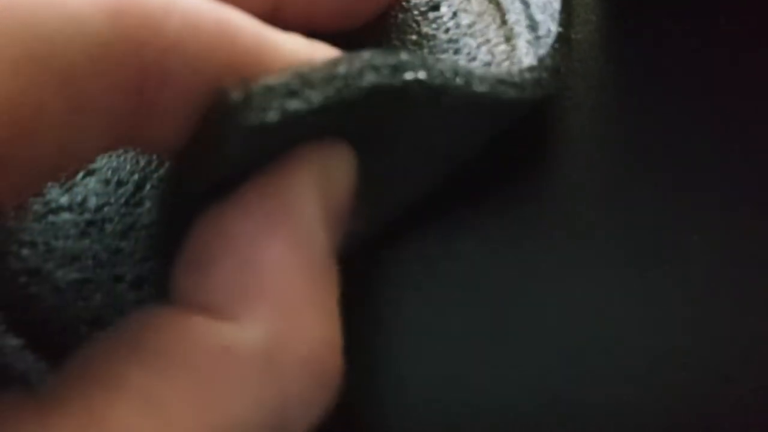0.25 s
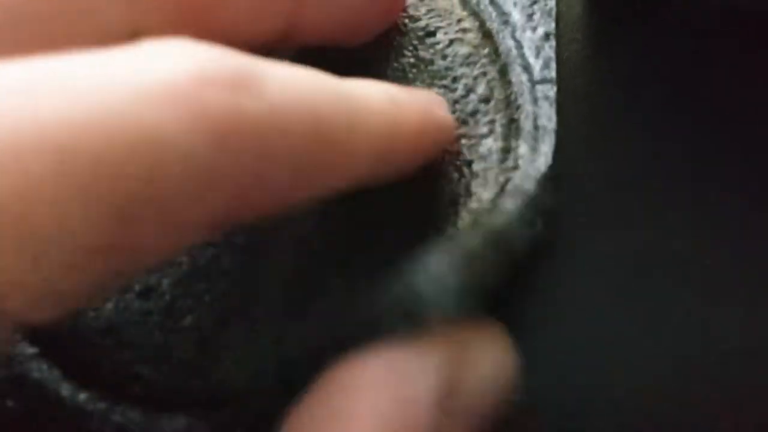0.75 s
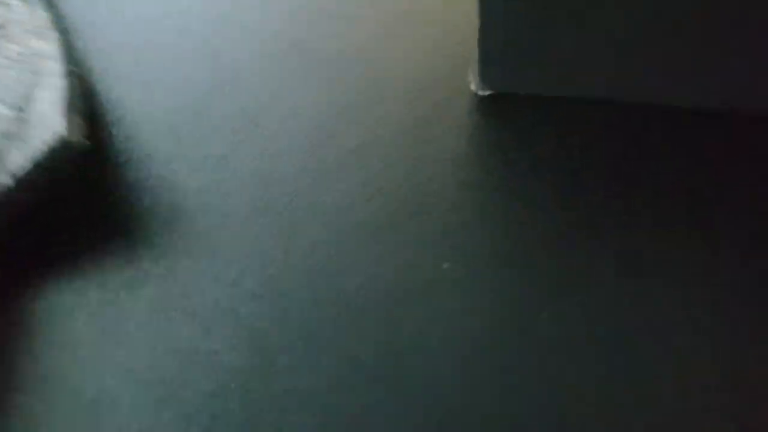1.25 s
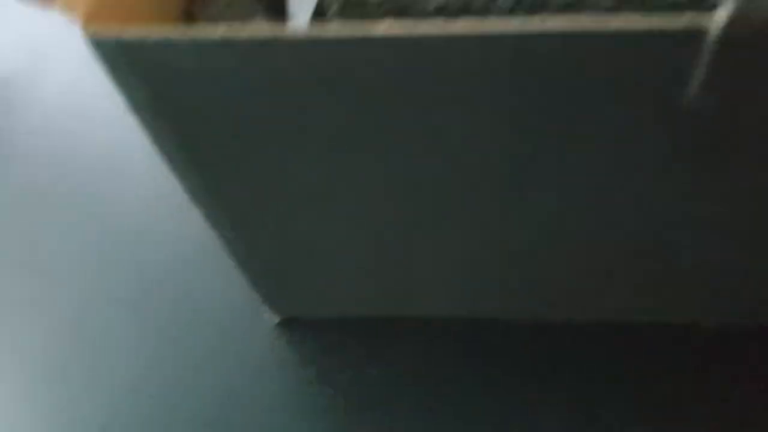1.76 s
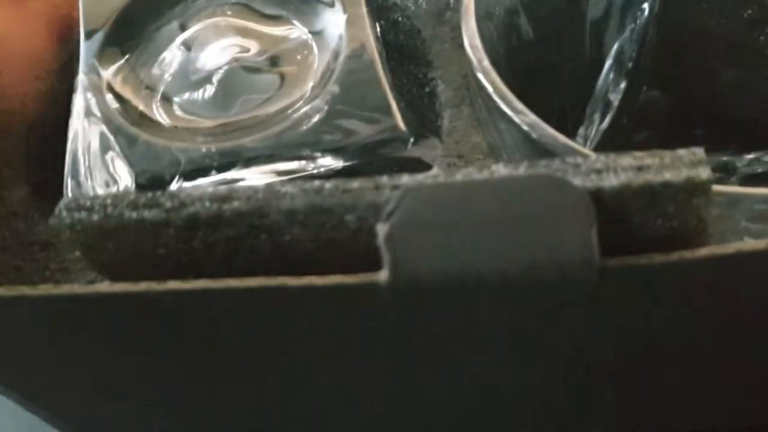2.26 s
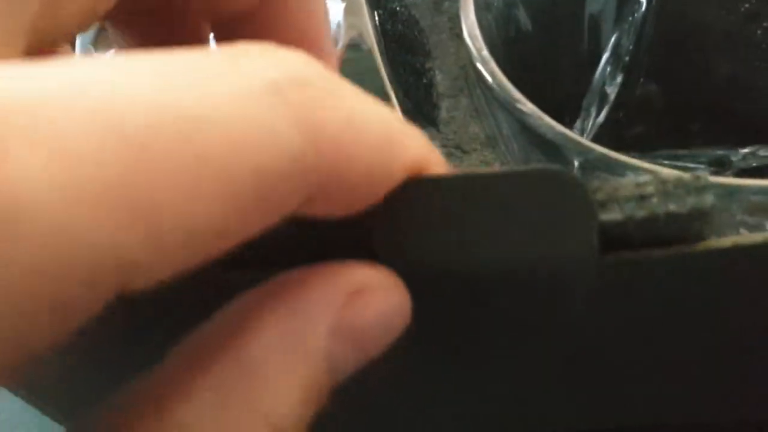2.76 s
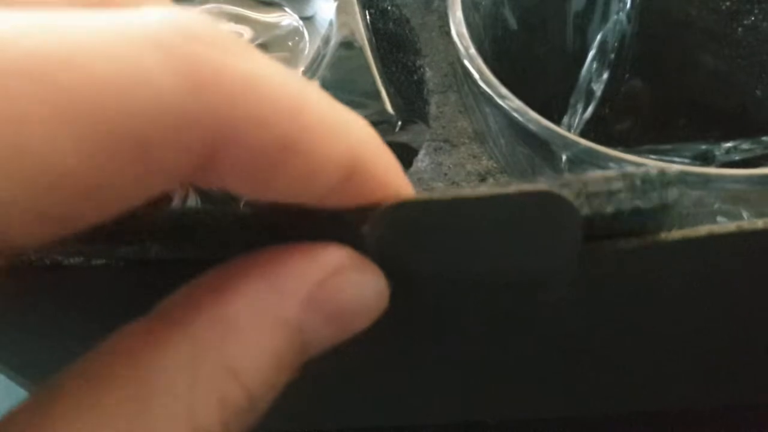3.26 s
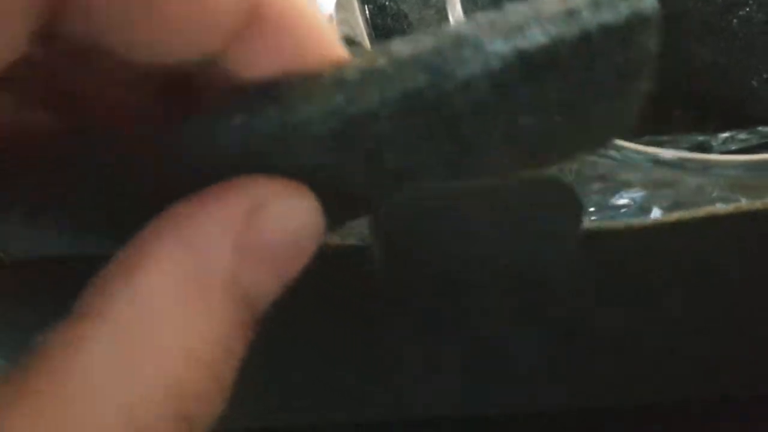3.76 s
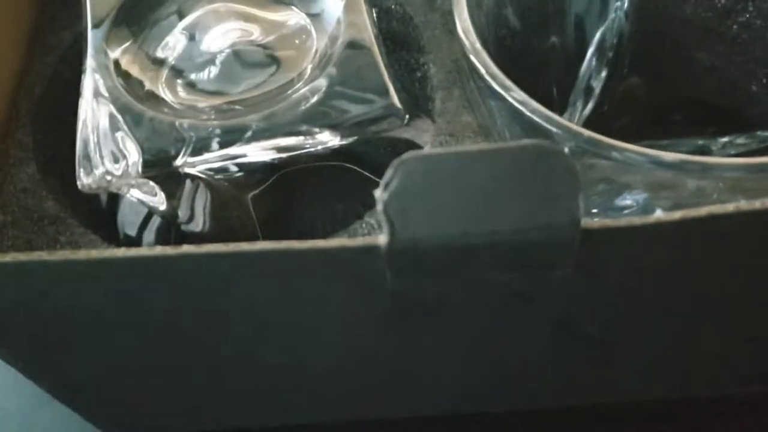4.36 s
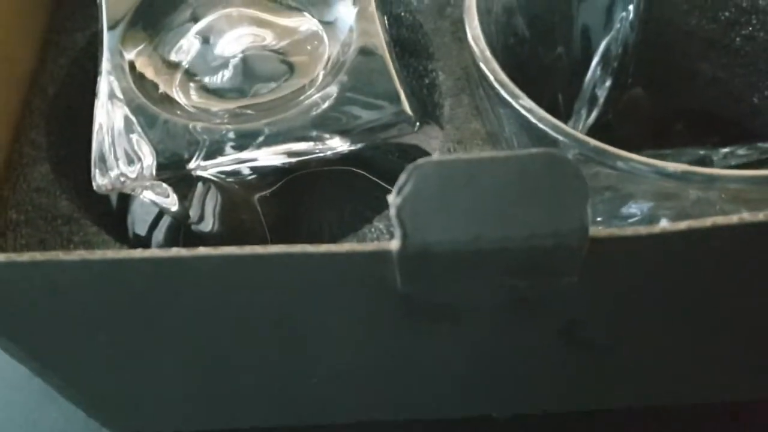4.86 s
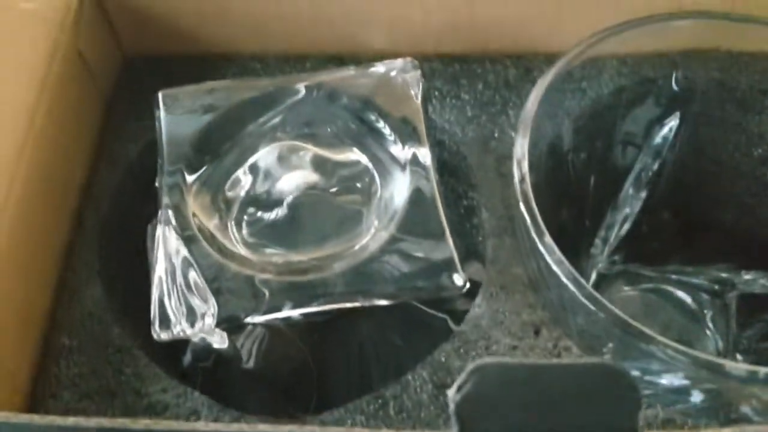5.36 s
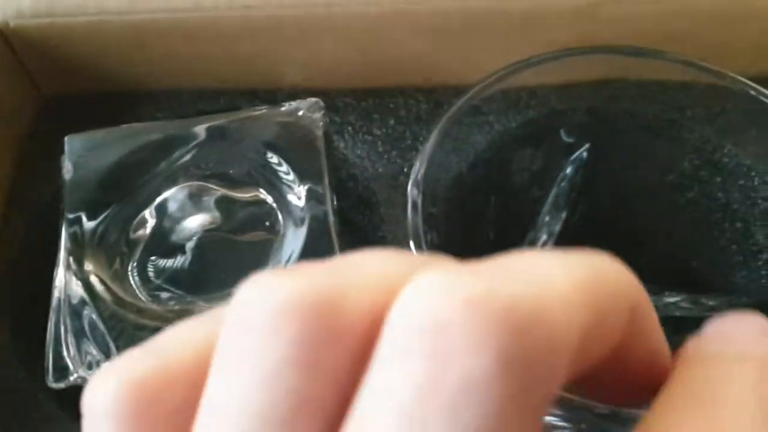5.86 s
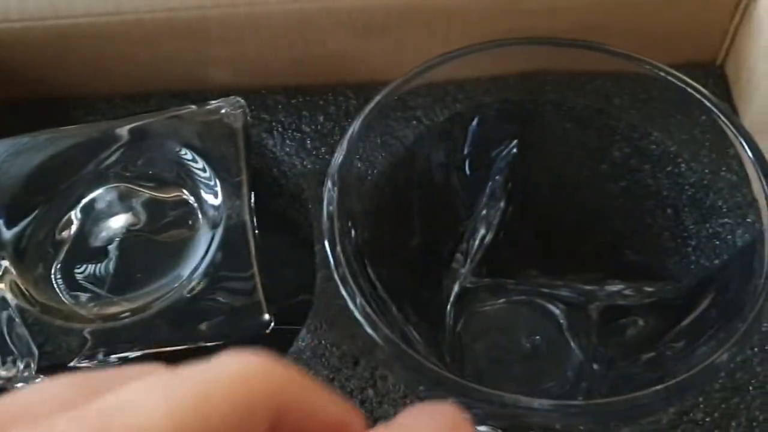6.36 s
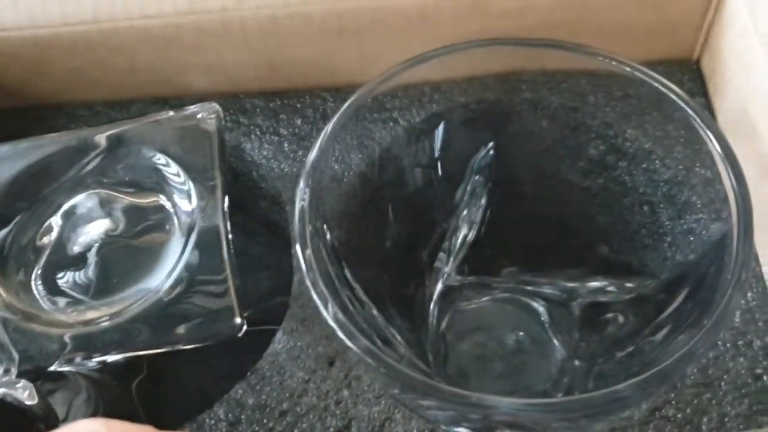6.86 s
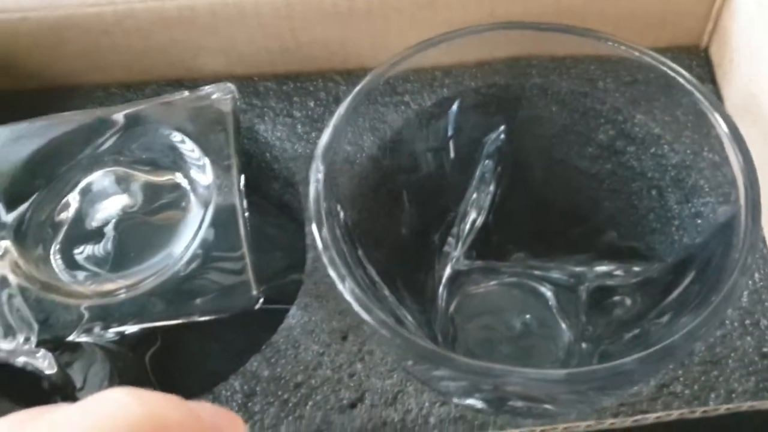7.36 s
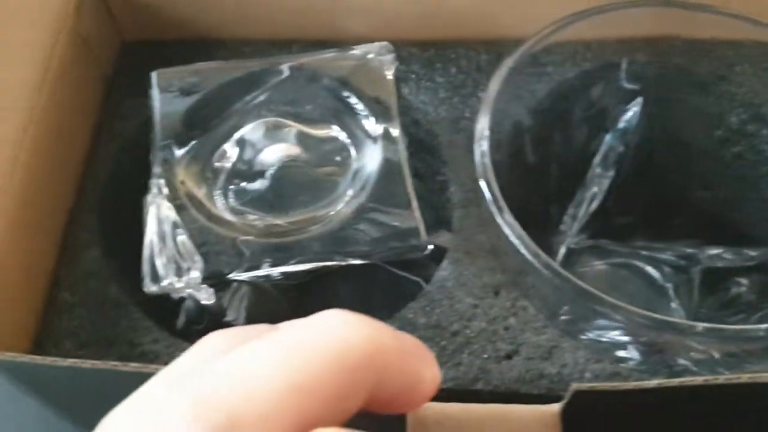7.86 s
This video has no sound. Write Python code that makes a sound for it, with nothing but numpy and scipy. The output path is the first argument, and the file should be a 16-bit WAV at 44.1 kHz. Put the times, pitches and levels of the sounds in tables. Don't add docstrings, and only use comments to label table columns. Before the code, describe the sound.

A foam sheet fizzes and scrapes out of a cardboard box, its flap snapping loudly; hand brushing and two hard knocks follow, then near silence.

```python
import sys
import numpy as np
from scipy import signal
from scipy.fft import rfft, irfft, next_fast_len
from scipy.io import wavfile
from scipy.ndimage import uniform_filter1d

SR = 44100
rng = np.random.default_rng(int(sys.argv[2]) if len(sys.argv) > 2 else 0)


def invert_db(level):
    return 10 ** (np.asarray(level, dtype=float) / 20)


def inscribe(sig):
    pcm = np.round(np.clip(np.atleast_2d(sig).T, -1, 1) * 32767)
    wavfile.write(sys.argv[1], SR, pcm.astype(np.int16))


N = 358091


def evened(x):
    return x / np.sqrt(np.mean(x ** 2) + 1e-20)


def peaked(x):
    return x / abs(x).max()


def read(points, hz):
    f, value = np.transpose(points)
    return np.interp(np.log(hz + 1), np.log(f + 1), value)


def track(points, rest):
    start_s, value = np.transpose(points)
    times = np.r_[start_s[0] - .03, start_s, start_s[-1] + .15]
    return np.interp(np.arange(N) / SR, times, np.r_[rest, value, rest])


def smooth_gain(db):
    return uniform_filter1d(invert_db(db), size=64)


def strokes(rows):
    drop_db, rest_db, hop = 20, -110, 32
    peak, rise, fall, db = np.transpose([row[:4] for row in rows])[:, :, None]
    late = np.arange(0, N + hop, hop) / SR - peak
    level_db = db - drop_db * np.where(late < 0, -late / abs(rise), late / abs(fall))
    loudest_db = np.maximum(level_db.max(0), rest_db)
    return np.repeat(loudest_db, hop)[:N], np.repeat(level_db.argmax(0), hop)[:N]


def convolved(x, taps):
    taps = taps.reshape((1,) * (x.ndim - 1) + (-1,))
    return signal.oaconvolve(x, taps, axes=-1)[..., :x.shape[-1]]


def coloured(x, points):
    gain_db = np.maximum(read(points, abs(np.fft.fftfreq(4096, 1 / SR))), -100)
    log_gain = np.log(invert_db(gain_db))
    return convolved(x, np.fft.ifft(np.exp(np.conj(signal.hilbert(log_gain)))).real[:2048])


def ring(x, modes, stretch=1):
    t = np.arange(4096) / SR
    taps = sum(invert_db(db) * width * np.exp(-np.pi * width * t) * np.sin(2 * np.pi * hz * stretch * t)
               for hz, width, db in modes)
    return convolved(x, taps)


def above(x, hz):
    return signal.sosfilt(signal.butter(3, hz, "highpass", fs=SR, output="sos"), x)


def edged(x):
    taps = signal.firwin(255, 15720, window=("kaiser", 6), fs=SR)
    return signal.oaconvolve(x, taps[None], "same")


# pitch_hz, likeness [0-1]
LIKENESS = [(60, 0.54), (300, 0.8), (800, 0.67), (2000, 0.35), (6000, 0.026), (15000, 0.087)]
BOX_LAG, TABLE_LAG = 8, 20


def ports(near, other, lag):
    size = next_fast_len(len(near))
    same = np.clip(read(LIKENESS, np.fft.rfftfreq(size, 1 / SR)), 0, 1)
    right = same * rfft(np.roll(near, round(lag)), size) + np.sqrt(1 - same ** 2) * rfft(other, size)
    return np.array([near, irfft(right, size)[:len(near)]])


def leaned(pair, lean_db):
    g = invert_db(lean_db)
    return pair * np.reshape([g, np.ones_like(g)], (2, -1)) * 2 / np.sqrt(1 + g ** 2)


def slips(per_s, spread_db, clump_db, lag):
    clump = invert_db(clump_db * evened(uniform_filter1d(rng.standard_normal(N), size=400)))
    happens = rng.random(N) < per_s / SR
    size = invert_db(spread_db * np.minimum(rng.exponential(1, N), 5)) * happens * clump
    return ports(size * rng.standard_normal(N), np.roll(size, 60) * rng.standard_normal(N), lag)


def contact(length, linger):
    t = np.arange(4096) / SR
    u = t * SR / length
    touch = u * np.exp(1 - u) ** 1.1
    scrape = linger * (1 - np.exp(-u)) * np.exp(-t / 0.019)
    return ports(*((touch + scrape) * rng.standard_normal((2, 4096))), lag=BOX_LAG)


def add(mix, s, sound):
    part = mix[:, round(s * SR):][:, :sound.shape[1]]
    part += sound[:, :part.shape[1]]


# pitch_hz, level_db [per Hz]
AIR = [(65, -28.5), (110, -13.5), (209, -8.5), (352, -20), (591, -27.5), (1100, -30), (1970, -28.5),
       (3300, -32), (4430, -31), (5300, -35.5), (6600, -33.5), (8000, -46.5), (12200, -33.5), (15700, -30)]
# pitch_hz, width_hz, level_db [rms]
WHINE = [(1120, 3.5, -93), (4413, 30, -91)]


def floor():
    air = invert_db(-74) * evened(coloured(ports(*rng.standard_normal((2, N)), lag=0), AIR))
    t = np.arange(N) / SR
    for hz, width, db in WHINE:
        wander = np.cumsum(rng.standard_normal(N)) * np.sqrt(2 * np.pi * abs(width) / SR)
        air = air + invert_db(db) * np.sin(2 * np.pi * hz * t + wander)
    return air


# start_s, level_db
RUMBLE = [(0.0, -75), (.09, -58), (.57, -61.5), (.9, -69.5), (1.1, -53), (1.9, -59.5), (2.35, -69.5),
          (2.5, -49), (2.85, -58), (3.39, -61.5), (3.62, -63.5), (4.4, -67), (4.61, -57), (5.2, -67.5),
          (5.6, -50.5), (6.1, -59.5), (7.42, -72.5), (8.12, -73)]
# peak_s, level_db
JOLTS = [
    (1.99, -57.5),
    (2.42, -65),
    (3.48, -58),
    (3.98, -58),
    (5.02, -56.5),
    (5.61, -46),
    (5.97, -52),
    (6.4, -51),
    (7.618, -61),
    (8.12, -60.5),
]
# pitch_hz, width_hz, level_db
SHAKE = [(59, 6, -1.5), (120, 73, -9)]


def rumble():
    rise_s, fall_s = 0.14, 0.44
    pair = ports(*rng.standard_normal((2, N)), lag=0)
    jolt_db = strokes([(s, rise_s, fall_s, db) for s, db in JOLTS])[0]
    level_db = np.maximum(track(RUMBLE, rest=-70), jolt_db)
    return evened(ring(ring(pair, SHAKE), [(68.94, 65, 0)])) * smooth_gain(level_db)


def mirrored(pair):
    echo_s, drift_s, share = .0006, .00025, 0.33
    t = np.arange(N) / SR
    knots = np.arange(0, t[-1] + 1, .16)
    drift = rng.uniform(-1.1, 1, (2, len(knots)))
    delays = [echo_s + drift_s * np.interp(t, knots, d) for d in drift]
    return np.array([x + share * np.interp(t - delay, t, x) for x, delay in zip(pair, delays)])


# peak_s, rise_s, fall_s, fizz_db, scrape_db [relative]
SQUEEZES = [
    (0.0, .1, 0.65, -56, -21),
    (0.2, 0.18, 0.31, -60, -21),
    (0.606, 0.085, 0.13, -50.5, -21),
    (0.66, 0.013, 0.18, -43.5, -20),
    (0.782, 0.14, 0.11, -40.5, -13),
]
# start_s, effort_db
DRAG = [
    (0.87, -53),
    (0.93, -39),
    (0.982, -34),
    (1.274, -24.5),
    (1.394, -26),
    (1.502, -32.5),
    (1.666, -35.5),
    (1.8, -45),
    (1.926, -78),
]
# peak_s, rise_s, fall_s, fizz_db, scrape_db [relative]
PULLS = [(2.432, 0.0078, 0.12, -46.5, -3.5), (2.51, 0.099, 0.075, -66, 0), (2.65, 0.085, 0.093, -61, 6),
         (2.72, 0.035, 0.069, -42, -25), (2.80, 0.1, 0.073, -49.5, -11), (2.86, .05, 0.6, -59.5, -29),
         (2.981, 0.013, 0.092, -43, -16), (3.105, 0.061, 0.35, -54.5, -16), (3.19, 0.052, 0.1, -52.5, -15),
         (3.26, 0.35, 0.53, -61, -11), (3.38, 0.26, 0.18, -50, -17), (3.462, 0.065, 0.17, -41.5, -12.5),
         (3.638, 0.028, 0.37, -42, -11), (3.665, 0.063, 0.046, -42, -9), (3.777, 0.2, 0.12, -38, -7),
         (3.82, 0.091, 0.036, -42, -14), (3.92, 0.35, 0.14, -58.5, 4.5), (3.98, 0.08, 0.032, -43.5, -5),
         (4.04, 0.23, 0.066, -47.5, -8), (4.17, 0.0092, 0.12, -46.5, -16), (4.188, 0.037, 0.018, -40, -11),
         (4.225, 0.15, 0.15, -48, -14), (4.258, 0.042, 0.11, -40, -8.5), (4.32, 0.11, 0.062, -44, -9.5),
         (4.41, 0.024, 0.21, -44, -11), (4.461, 0.065, 0.048, -37.5, -20.5), (4.521, 0.079, 0.59, -52, -21),
         (4.775, 0.28, .05, -46.5, -16.5), (4.785, 0.048, 0.084, -41, -10.5), (4.804, .05, 0.026, -39, -10),
         (4.88, 0.12, 0.04, -52, -13)]
# peak_s, rise_s, fall_s, fizz_db, scrape_db [relative]
BRUSHES = [(5.535, 0.0016, 0.25, -54.5, 1), (5.58, 0.014, 0.075, -41.5, 2.5), (5.6, 0.025, 0.046, -52.5, 5),
           (5.642, .03, 0.17, -65.5, 13), (5.79, .1, 0.44, -80, 11.5), (5.871, 0.12, 0.13, -66.5, 14.5),
           (5.885, 0.043, 0.14, -54.5, -6), (5.946, 0.034, 0.028, -47.5, 3.5), (6.201, 0.004, 0.62, -63, 2),
           (6.34, 0.071, 0.039, -42, -16.5), (6.355, 0.027, 0.044, -60.5, 10.5),
           (6.454, 0.084, 0.055, -48.5, -1.5), (6.49, 0.05, 0.085, -65.5, 3)]
# pitch_hz, level_db [per Hz]
FIZZ = [(1180, -36), (2000, -19), (2780, -32.5), (3160, -20), (3820, -15.5), (4990, -9), (5440, -5),
        (6570, -3), (7250, -5.5), (8300, -18), (9200, -14.5), (12700, -4.5), (15200, -6.5), (15700, 1)]
# pitch_hz, level_db [per Hz]
SCRAPE = [(590, -30), (1000, -13.5), (1860, -10.5), (2620, -4.5), (2970, -6), (4500, -3), (5850, -27),
          (9900, -120)]
# pitch_hz, level_db [per Hz]
BRUSH = [(530, -31.5), (900, -2), (1440, -19.5), (2060, -11.5), (2890, -13), (4860, -18), (7640, -35),
         (9000, -46), (11700, -74), (19800, -120)]
# start_s, lean_db [left-right]
LEAN = [(0.0, -2), (1.47, 0.5), (2.7, -1), (3.41, 5), (3.9, -0.5), (4.16, 5.5), (5.13, -4), (6.12, -3),
        (6.7, -7.5)]
DRAG_REST_DB = -110


def foam():
    sheet = SQUEEZES + PULLS
    drag_db = track(DRAG, rest=DRAG_REST_DB)
    fizz_db = np.maximum(strokes(sheet + BRUSHES)[0], drag_db)
    scrape_db, brush_db = (strokes([(s, rise, fall, db + relative) for s, rise, fall, db, relative in rows])[0]
                           for rows in (sheet, BRUSHES))
    scrape_db = np.maximum(scrape_db, np.minimum(drag_db - 18.5, -52.5))
    fizz = evened(coloured(slips(22000, 1.4, 0.8, lag=TABLE_LAG), FIZZ)) * smooth_gain(fizz_db)
    coarse = slips(9000, 0.42, 1.8, lag=TABLE_LAG)
    scrape = evened(coloured(coarse, SCRAPE)) * smooth_gain(scrape_db)
    brush = evened(coloured(coarse, BRUSH)) * smooth_gain(brush_db)
    return leaned(mirrored(fizz + scrape + brush), track(LEAN, rest=3.7))


# start_s, peak_db
BURSTS = [(.1628, -40), (.8186, -26), (.8328, -33), (.9055, -37), (.9364, -22), (.9856, -22.5),
          (1.1275, -28.5), (1.9005, -50), (1.9375, -48), (1.9425, -50), (3.3731, -35), (3.7891, -30.5),
          (3.8714, -25.5), (4.1631, -26.5), (4.2536, -28.5), (4.2624, -23.5), (4.2801, -33.5),
          (4.7839, -32)]
# pitch_hz, level_db [per Hz]
POP = [(410, -39), (700, -12.5), (4170, -10), (5020, 1.5), (8100, -13), (10700, -0.5), (16800, -11)]


def pops():
    out = np.zeros((2, N))
    for s, peak_db in BURSTS:
        tick = peaked(coloured(contact(18.0, 0.03), POP))
        add(out, s - .0003, leaned(invert_db(peak_db) * tick, 5.5))
    return out


# pitch_hz, t60_s
ROOM = [(100, 0.16), (500, 0.056), (3000, 0.19), (12000, 0.092)]


def room(x):
    taps = np.zeros((2, SR // 2))
    slots = np.arange(260, SR // 2 - 20, 20)
    at = slots + rng.integers(0, 20, (2, len(slots)))
    np.put_along_axis(taps, at, rng.choice([-1., 1.], at.shape), 1)
    hz, t, z = signal.stft(taps, SR, nperseg=256)
    tail = signal.istft(z * invert_db(-60 * t / read(ROOM, hz)[:, None]), SR, nperseg=256)[1]
    tail = ports(*tail, lag=0)
    return signal.fftconvolve(x.mean(0)[None], tail / np.linalg.norm(tail[0]), axes=1)[:, :N]


# start_s, peak_db, ring_db [relative], crack_db [relative], panel_hz
FLICK = [
    (.6700, -21, -44, -14.5, 856),
]
FAR_SNAPS = [
    (1.9, -42, -17, -14, 397),
    (1.937, -41, -7.5, -19, 550),
    (2.012, -53, -13, -30, 600),
    (2.028, -47, -10, -33, 626),
    (5.018, -46, -14, -20, 439),
    (5.038, -52, -14, -24, 600),
    (6.532, -40, -12, -16, 641),
]
FLAP_SNAPS = [(2.43, -40, -18, -14, 746), (2.4445, -19, 0.5, -9.5, 1046), (2.448, -31, -11, -8, 1070),
              (2.456, -26.5, 0.5, -1.5, 1000), (2.47, -28, 2, -12, 900), (2.98, -31.5, -15, -13.5, 1200),
              (2.99, -27, -9.5, -18, 474), (2.993, -30.5, -6, -11, 577), (3.4627, -25, -11, -3.5, 900),
              (3.4808, -16.5, -17, -7.5, 755), (3.4868, -16.5, -10.5, -8.5, 900),
              (3.4968, -25, -16, -17, 810)]
FLAP_SLAP = [
    (2.479, -12.5, -3, -12, 712),
]
RELEASE = [
    (2.695, -37.5, -25.5, -7, 696),
    (2.7037, -4.5, -16.5, -15, 680),
    (2.7052, -4, -14.5, -13, 1446),
]
WALL_SNAPS = [(5.5315, -41, 16, -12, 568), (5.543, -21, 0.5, -10, 536), (5.547, -18, -13.5, -13, 820),
              (5.5505, -35, -10, -19, 690), (5.57, -26, -12, -2, 900), (5.576, -19, -12.5, -10, 507),
              (5.585, -26.5, -3, -7, 750), (5.592, -24.5, 3.5, -26.5, 765), (5.689, -36, 7, -13, 656),
              (5.944, -30, -8.5, -12.5, 980), (5.9475, -29.5, -19, -8, 1040),
              (5.951, -31.5, -13.5, -21, 900), (6.007, -44.5, 1, -20, 676), (6.2, -34.5, -30, -13.5, 1020),
              (6.397, -27.5, 0, -11.5, 830), (6.4036, -18, -15, -7, 900)]
WALL_SLAP = [
    (5.5669, -11, -23.5, -17.5, 516),
]
FIRST_KNOCK = [
    (6.3024, -2.5, -10, -7, 703.4),
]
SECOND_KNOCK = [
    (6.406, -4, -30.5, -10.5, 705),
    (6.4071, 1.5, -11.5, -23.5, 705),
]
# pitch_hz, width_hz, level_db
FLICK_MODES = [(856, 68, -6), (1750, 270, 1.5), (2500, 270, -8), (3400, 280, 2), (5040, 270, -10),
               (5450, 300, -4)]
BOX = [(239, 60, -16), (422, 110, 12), (730, 66, 6), (1070, 210, 4), (1390, 710, 8.5), (1960, 430, 3.5),
       (2380, 280, -7), (3180, 270, -18.5)]
RELEASE_MODES = [(689, 240, -3.5), (1420, 280, 1.5), (2190, 200, -6), (3060, 500, -5), (4720, 170, -2),
                 (5100, 260, -3), (5800, 270, -4), (7194, 280, -11.5)]
WALL_MODES = [(514, 380, -2.5), (1360, 240, 0), (2050, 290, 0), (2850, 310, 6.5), (4780, 410, -10),
              (6550, 300, -11), (7150, 300, -12.5)]
FIRST_MODES = [(670, 240, -5), (1364, 200, -7), (2180, 200, -7), (2775, 270, 4), (3170, 170, -4.5),
               (4130, 300, -6.5), (5200, 350, -0.5), (5660, 130, -3), (6070, 250, -6)]
SECOND_MODES = [(250, 24, -14), (479, 100, -10), (705, 46, 0), (1020, 90, -1), (1460, 110, -3.5),
                (1855, 150, 0.5), (2550, 350, -6.5), (3470, 160, -9), (4680, 130, -14), (5600, 77, -23),
                (6500, 100, -19)]
# pitch_hz, level_db [per Hz]
CRACK = [(1760, -51.5), (3000, -2.5), (4060, -8), (4660, -1.5), (6000, -1.5), (8240, -21), (12300, -11.5),
         (14600, -10), (16800, -32.5)]


def snap(out, row, lean_db, body, edge, stretch):
    s, peak_db, ring_db, crack_db, hz = row
    burst = contact(43, .018)
    crack = coloured(burst, CRACK)
    burst[:, 30] += edge
    panel = above(ring(burst[[0, 0]], [(hz, 210, 0), (258, 40, -8)]), 170)
    modes = above(ring(burst, body, stretch), 230)
    sound = invert_db(crack_db + 12.5) * peaked(crack) + invert_db(3.0) * peaked(modes)
    fade = invert_db(peak_db - 10.0) * np.linspace(1, 0, sound.shape[1])
    add(out, s - .0006, leaned(sound * fade, lean_db))
    add(out, s - .0006 + .0017, leaned(invert_db(ring_db + 1.5) * peaked(panel) * fade, lean_db))


def snaps():
    out = np.zeros((2, N))
    soft, hard = 5, 15
    for rows, lean_db in ((FAR_SNAPS, -17.5), (FLAP_SNAPS, 3), (WALL_SNAPS, 3.5)):
        for row in rows:
            snap(out, row, lean_db, BOX[2:], soft, rng.uniform(1.0, 1.04))
    for rows, lean_db, body in ((FLICK, 0.0, FLICK_MODES), (FLAP_SLAP, 3, SECOND_MODES),
                                (RELEASE, 4.2, RELEASE_MODES), (WALL_SLAP, 3.5, WALL_MODES),
                                (FIRST_KNOCK, 4.0, FIRST_MODES), (SECOND_KNOCK, 4.0, SECOND_MODES)):
        for row in rows:
            snap(out, row, lean_db, body, hard, 1)
    return out


def resonate(x, hz, width):
    turn, r = np.exp(2j * np.pi * np.cumsum(hz) / SR), np.exp(-np.pi * width / SR)
    return 2 * (turn * signal.lfilter([1 - r], [1, -r], x / turn)).real


# peak_s, rise_s, fall_s, level_db, gap_hz
SIDE_PULLS = [(1.858, 0.011, 0.25, -75.5, 844), (2.032, 0.006, 0.079, -66.5, 585),
              (2.424, 0.0065, 0.24, -51.5, 766), (2.51, 0.074, 0.13, -58, 839),
              (2.561, .002, 0.11, -52, 1260), (2.608, 0.002, .15, -48, 1040),
              (2.655, 0.087, 0.074, -49, 1064), (2.78, 0.039, .066, -44.5, 850),
              (2.99, 0.024, 0.14, -56, 660), (3.372, 0.22, .3, -58, 666), (3.48, 0.17, 0.16, -51, 880),
              (3.774, 0.15, 0.28, -48, 839), (3.93, 0.18, 0.17, -52.5, 780),
              (4.054, 0.81, 0.033, -51.5, 730), (4.185, 0.028, .04, -51, 651.4),
              (4.27, 0.066, .1, -64, 900), (4.5, .2, .5, -76.5, 500), (4.834, 0.12, 0.061, -68, 699)]
# peak_s, rise_s, fall_s, level_db, gap_hz
SIDE_PRESSES = [(5.534, 0.002, 0.29, -52, 504.5), (5.595, .035, 0.23, -54, 725), (5.85, 0.1, 0.4, -52, 800),
                (5.949, .15, .073, -56.5, 886), (6.203, 0.004, 0.1, -58, 888), (6.275, 0.09, 0.2, -50, 960),
                (6.37, 0.12, 0.11, -49, 718), (6.45, .1, .07, -46, 823), (6.53, .06, 0.3, -67, 657.5)]
# peak_s, rise_s, fall_s, level_db
FLEXES = [(2.424, 0.0066, .3, -65), (2.51, 0.088, 0.024, -48.5), (2.65, 0.06, 0.081, -52),
          (2.76, 0.41, 0.14, -57.5), (3.02, 0.15, 0.19, -65), (3.372, 0.084, 0.13, -55.5),
          (3.66, 0.028, 0.047, -51.5), (4.054, 0.91, 0.097, -60.5), (4.178, 0.023, 0.094, -59.5),
          (4.5, 0.12, 0.38, -77), (5.02, 0.017, 0.089, -68), (5.534, 0.0022, 0.08, -41.5),
          (5.7, 0.071, 0.15, -60.5), (5.97, 0.39, 0.15, -61.5), (6.352, 0.087, 0.21, -56.5),
          (6.411, 0.005, 0.05, -31), (6.52, 0.054, 0.27, -76)]
# pitch_hz, width_hz, level_db
PANEL = [(253, 19, 0)]


def walls():
    rows = SIDE_PULLS + SIDE_PRESSES
    drive = slips(4000, 1.0, 2.0, lag=BOX_LAG)
    level_db, which = strokes(rows)
    effort_db = track(DRAG, rest=DRAG_REST_DB)
    drag_db = np.where(effort_db > DRAG_REST_DB + 1, -36 + 0.78 * effort_db, DRAG_REST_DB)
    gap_hz = np.where(drag_db > level_db, 900, np.array(rows)[which, -1])
    gap = evened(resonate(drive, uniform_filter1d(gap_hz, size=1500), 370))
    panels = 0.32 * evened(ring(drive, BOX[2:5])) - 0.66 * evened(ring(drive, BOX[1:2]))
    sides = evened(above(gap + panels, 280)) * smooth_gain(np.maximum(level_db, drag_db))
    bottom_db = np.maximum(strokes(FLEXES)[0], drag_db - 18.5)
    bottom = evened(above(ring(drive, PANEL), 120)) * smooth_gain(bottom_db)
    return leaned(sides + bottom, 3.1)


# start_s, length_s, pitch_hz, level_db
CREAKS = [(1.123, .12, 6900, -53), (1.217, 0.051, 5530, -38), (1.38, 0.048, 6630, -29.5),
          (1.855, 0.021, 630, -55.5), (1.856, 0.047, 1003, -63), (2.026, 0.046, 608, -59.5),
          (2.505, 0.022, 1960, -56), (2.557, 0.016, 1410, -45.5), (2.606, 0.085, 1420, -52),
          (2.607, 0.058, 900, -61), (2.772, 0.025, 1080, -46), (3.265, 0.047, 856, -62),
          (3.65, .025, 6550, -49), (3.77, 0.021, 2700, -44), (3.801, 0.036, 935, -42.5),
          (3.91, 0.052, 835, -48), (3.965, 0.022, 3470, -43.5), (4.069, 0.059, 1650, -64),
          (4.172, 0.025, 504, -60), (4.255, 0.048, 6500, -45.5), (4.446, 0.027, 6400, -60),
          (4.672, 0.11, 2780, -63), (4.683, 0.17, 1077, -71.5), (4.825, 0.02, 643, -55.5),
          (5.825, 0.047, 776, -44.5), (5.837, .08, 2570, -78), (5.875, 0.045, 880, -47.5),
          (6.01, 0.11, 4930, -75), (6.044, 0.051, 2600, -71), (6.393, 0.013, 800, -33)]


def creaks():
    out = np.zeros((2, N))
    for s, length, hz, db in CREAKS:
        width = .045 * hz
        t = np.arange(round(2 * length * SR)) / SR
        rub = ports(*rng.standard_normal((2, len(t))), lag=2)
        sung = evened(ring(ring(rub, [(hz, width, 0)]), [(hz, 3 * width, 0)]))
        add(out, s, invert_db(db) * sung * signal.windows.tukey(len(t), .2) * np.exp(-(t / length) ** 2))
    return leaned(invert_db(-5.0) * out, 3.5)


# start_s, peak_db, pitch_hz
THUDS = [(1.131, -47.5, 74.4), (2.431, -40.5, 78.5), (2.699, -47.5, 120), (3.787, -49.5, 177),
         (4.261, -58, 149), (5.009, -47, 71.6), (5.532, -39.5, 124.3), (5.701, -45.5, 122),
         (5.948, -39.5, 113), (6.008, -45.5, 75), (6.402, -39.5, 153)]


def thuds():
    out, t = np.zeros((2, N)), np.arange(8192) / SR
    for s, peak_db, hz in THUDS:
        push = (1 - np.exp(-t / 0.00064)) * np.exp(-t / .019) * np.sin(2 * np.pi * hz * t)
        add(out, s, leaned(invert_db(peak_db) * peaked(np.array([push, push])), 3.5))
    return out


def scene():
    hits = snaps() + pops()
    steady = edged(invert_db(-10.5) * room(hits) + foam() + floor())
    return hits + steady + walls() + creaks() + thuds() + rumble()


def top_cut(x):
    return signal.sosfilt(signal.butter(12, 17000, fs=SR, output="sos"), x)


# pitch_hz, lean_db [left-right]
PORT_LEAN = [(60, 1), (700, 3), (2400, 4.5), (8100, 6), (15000, 3)]


def record(dry):
    size = next_fast_len(N)
    lean = invert_db(read(PORT_LEAN, np.fft.rfftfreq(size, 1 / SR)) / 2)
    heard = irfft(rfft(above(dry, 50), size) * np.array([lean, 1 / lean]), size)[:, :N]
    heard = .95 * np.tanh(heard / .95)
    heard = signal.oaconvolve(heard, signal.firwin(255, 16900, fs=SR)[None], "same")
    return top_cut(heard)


dry = scene()
out = record(dry)
inscribe(out)
```